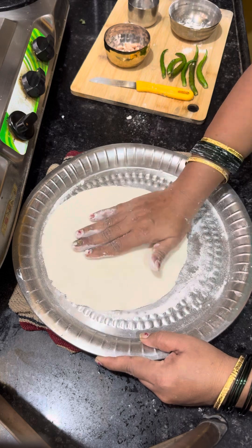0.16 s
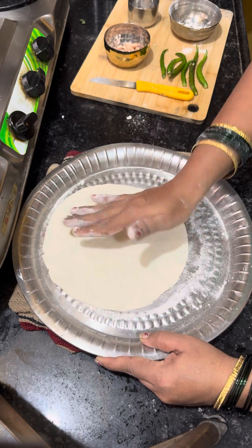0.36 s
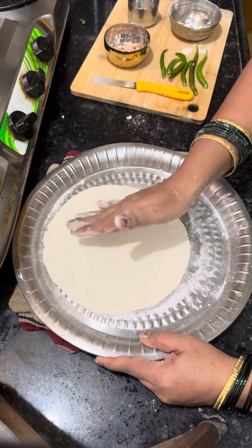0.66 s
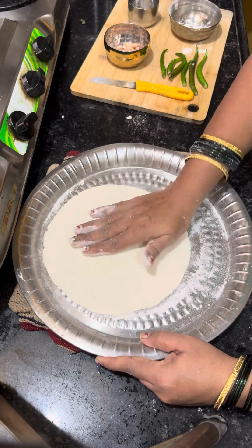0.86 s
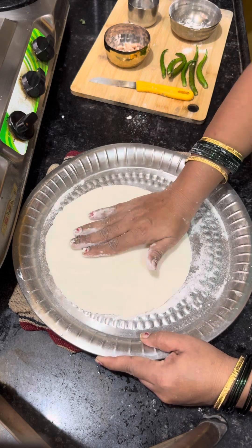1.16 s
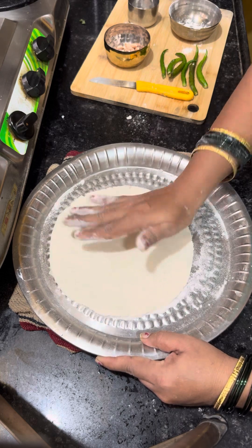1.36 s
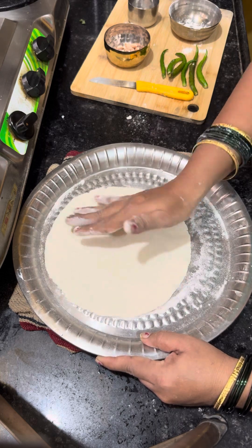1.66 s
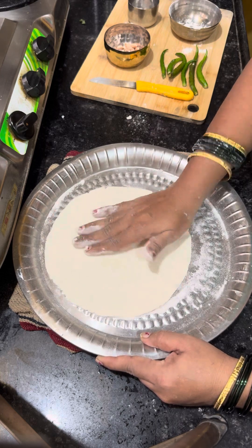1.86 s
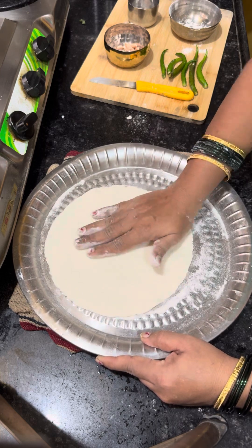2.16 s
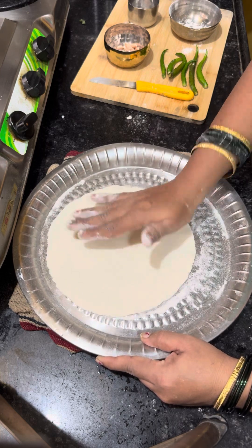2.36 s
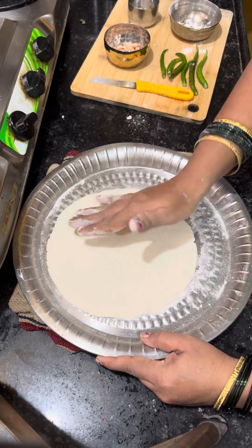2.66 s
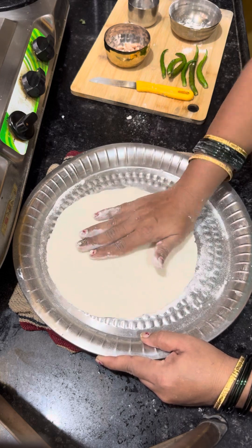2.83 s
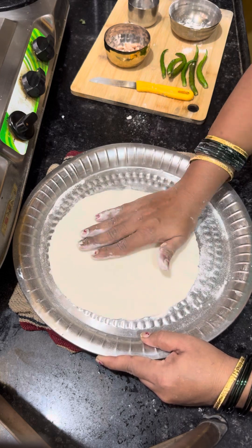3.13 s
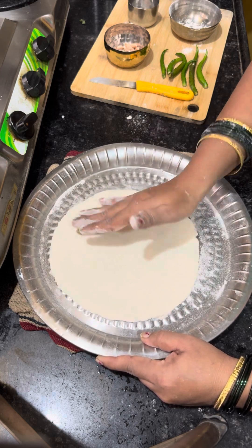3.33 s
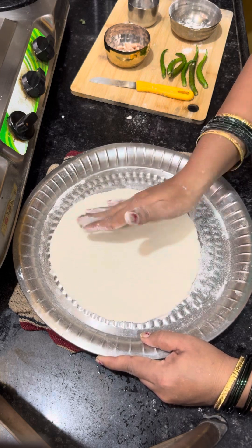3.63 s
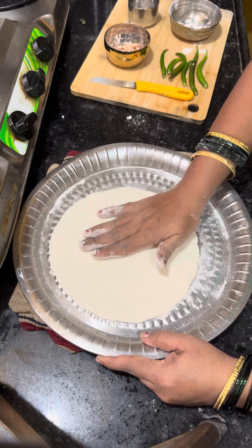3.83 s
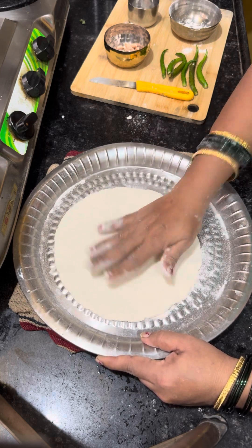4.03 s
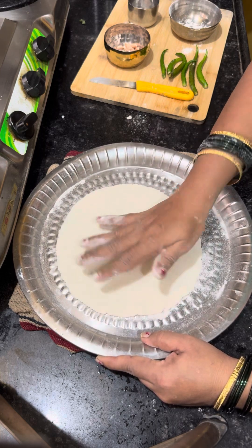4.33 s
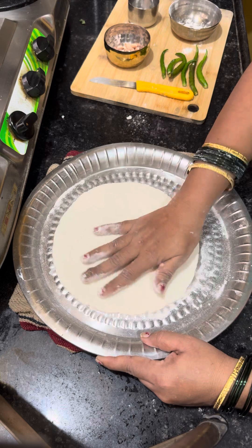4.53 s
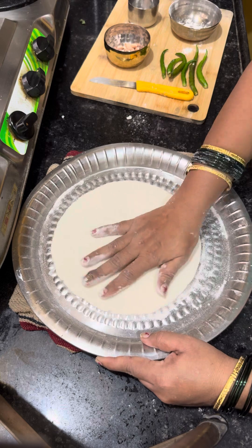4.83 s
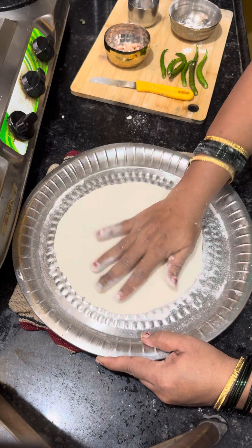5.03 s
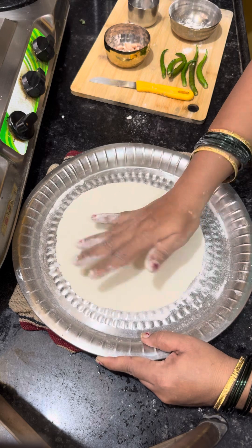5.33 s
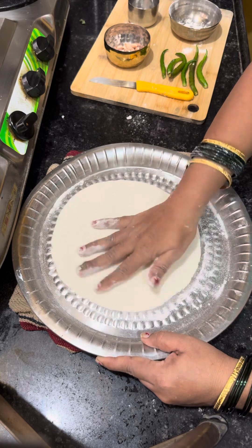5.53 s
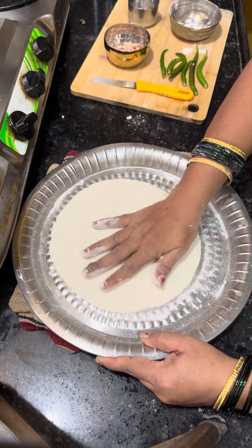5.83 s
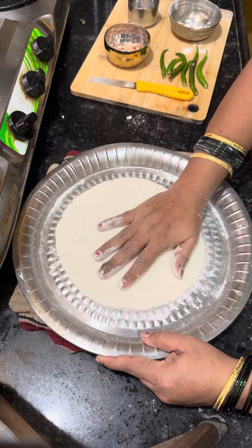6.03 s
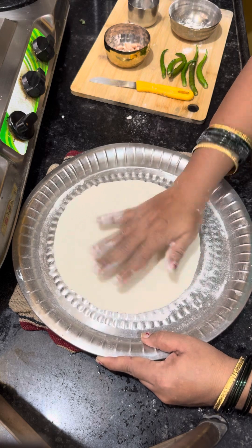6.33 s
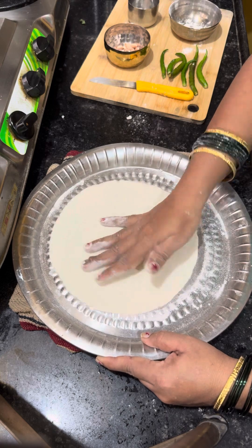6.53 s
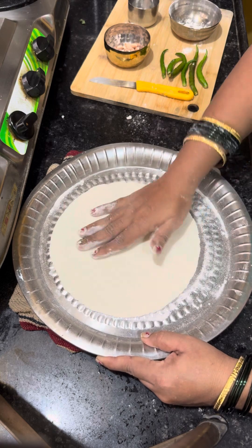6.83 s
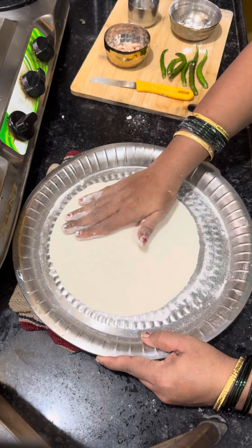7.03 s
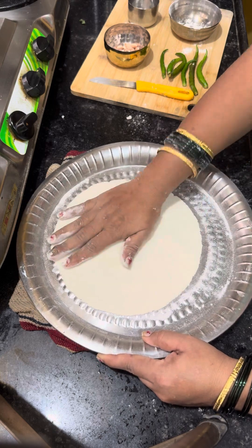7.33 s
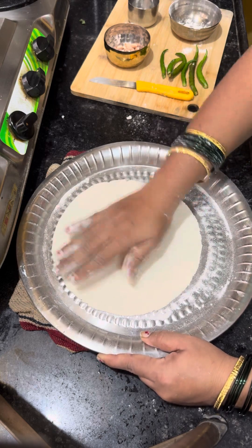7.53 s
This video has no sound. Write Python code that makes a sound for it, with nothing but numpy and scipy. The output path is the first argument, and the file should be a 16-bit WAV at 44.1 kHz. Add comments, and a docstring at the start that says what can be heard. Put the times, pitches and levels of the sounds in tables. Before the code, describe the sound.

A hand pats soft dough on a thin steel plate about three times a second, the plate ringing and glass bangles clinking with most pats.

```python
"""A hand pats a round of dough flat on a floured steel plate, about three times a second, in a small kitchen.
Fingertips graze the dough, then the fingers land with a dull slap of noise and a pop of trapped air.
A moment later, on most pats, the heel of the hand comes down: the plate rings in decaying modes and the
glass bangles gather, crack together and shiver. Then a swell of friction noise pushes the dough round.
About two thirds of the way through comes one faint thin tone; creeping dough and room tone run throughout."""
import sys
import numpy as np
from scipy import signal
from scipy.fft import rfft, irfft, next_fast_len
from scipy.io import wavfile

SR = 44100
rng = np.random.default_rng(int(sys.argv[2]) if len(sys.argv) > 2 else 0)


def to_wav(sig):
    """Store sig (one row per channel, or 1-D mono) as 16-bit WAV at the path in sys.argv[1].

    Samples outside -1..1 are clipped; the rate is SR.
    """
    pcm = np.clip(np.atleast_2d(sig), -1, 1) * 32767
    pcm = np.round(pcm).astype(np.int16)
    wavfile.write(sys.argv[1], SR, pcm.T)  # frames by channels


N = 338671
AGE = np.arange(SR // 2) / SR  # time since a contact [s]
# an ordinary slap and a firm knock, against which the others are weighed [dB]
USUAL_SLAP_DB, FIRM_KNOCK_DB = -27.5, -25
HEEL_WITHIN_S = 0.05  # the heel follows the fingers within this time, or not at all


# fingers landing on dough: (time [s], relative level [dB], pitch of the trapped air [Hz])
FINGER_SLAPS = [(0.136, -28, 1100), (0.47, -25.5, 1124), (0.794, -32, 726), (1.125, -30.5, 760),
                (1.457, -25, 1150), (1.785, -29.5, 1140), (2.116, -31, 1180), (2.449, -32.5, 1080),
                (2.779, -33, 960), (3.116, -31, 1085), (3.451, -36, 830), (3.782, -30, 920),
                (4.098, -25.5, 740), (4.4228, -27, 760), (4.7503, -28, 1130), (5.09, -27, 815),
                (5.4234, -26.5, 645), (5.739, -27, 800), (6.063, -27, 785), (6.4028, -24, 780),
                (6.747, -30, 890), (7.34, -30, 910), (7.628, -28.5, 1230)]
# time the hand takes to lie flat, long for the closed palm, short for spread fingers:
# (time [s], landing time [s])
LANDING_TIME = [(1.45, 0.0036), (2.2, 0.0046), (3.5, .0045), (4.45, 0.0016), (5.1, .0011), (6.75, 0.0011),
                (7.3, 0.0024)]
# colour of the air pop: (frequency [Hz], relative level per Hz [dB])
POP_SPECTRUM = [(150, -6), (380, -2.5), (560, 0), (800, -0.5), (1150, -1), (1400, 0.5), (1750, -5),
                (2500, -9.5), (3100, -19), (6000, -44)]
# colour of the dull thud: (frequency [Hz], relative level per Hz [dB])
THUD_SPECTRUM = [(20, -23), (60, -14), (140, -15), (240, -1.5), (300, 0.5), (420, -16.5), (900, -37)]
# colour of the faint crack: (frequency [Hz], relative level per Hz [dB])
CRACK_SPECTRUM = [(1500, -30), (3200, 2), (4700, 9.5), (6000, 2.5), (8500, -3), (12000, -4.5), (16000, 4)]


def slaps(slap_db=26.5, thud_db=-9, thud_growth=0.61, no_heel_db=-6, crack_db=-17, crack_growth=1.3,
          spread_db=5, flat_s=0.001, spread_growth_db=4):
    """Soft skin on dough: a pop of trapped air, a faint crack and a thud, weaker when the heel stays up."""
    out = np.zeros(N)
    for s, db, air_hz in FINGER_SLAPS:
        rise_s = at_time(LANDING_TIME, s)
        force_db = db - USUAL_SLAP_DB
        heel_up = not any(0 < knock[0] - s < HEEL_WITHIN_S for knock in HEEL_KNOCKS)

        # a slow landing breaks up into many small contacts
        spray_db = spread_db + spread_growth_db * np.log2(rise_s / flat_s)
        contact = colour(impact(spray_db, rise_s=rise_s, t60=0.055), POP_SPECTRUM)
        pop = pocket(contact, air_hz, width_hz=240, boost_db=6.5)
        thud = colour(impact(spread_db=-0.5, rise_s=rise_s, t60=0.16), THUD_SPECTRUM)
        crack = colour(burst(rise_s=rise_s + 0.00024, t60=0.066), CRACK_SPECTRUM)

        pop_gain = from_db(db + slap_db)
        thud_gain = from_db(thud_db + thud_growth * force_db + no_heel_db * heel_up)
        crack_gain = from_db(crack_db + crack_growth * force_db)
        # start early, so that the main contact falls at s
        add(out, s - rise_s, pop_gain * unit(pop) + thud_gain * unit(thud) + crack_gain * unit(crack))
    return out


# colour of skin brushing dough: (frequency [Hz], relative level per Hz [dB])
BRUSH_SPECTRUM = [(200, -12.5), (650, 10), (1200, -2.5), (2500, -8.5), (4000, -26), (12000, -27.5),
                  (16000, -51)]


def approaches(level_db=17, lead=3.0, slow_s=0.0041):
    """Fingertips graze the dough before the hand lies flat: the slower the landing, the more of it."""
    out = np.zeros(N)
    for s, db, _ in FINGER_SLAPS:
        rise_s = at_time(LANDING_TIME, s)
        graze = unit(colour(burst(rise_s=lead * rise_s, t60=0.027), BRUSH_SPECTRUM))
        add(out, s - lead * rise_s, from_db(db + level_db) * rise_s / slow_s * graze)
    return out


# heel of the hand coming down:
# (time [s], relative level of the plate knock [dB], relative level of the bangle clash [dB])
HEEL_KNOCKS = [(0.1467, -28.5, -38.5), (0.481, -31, -37), (0.804, -25, -34), (1.135, -32, -37.5),
               (1.466, -31.5, -37.5), (1.7896, -25.5, -37), (2.124, -26.5, -36), (2.4563, -24, -33),
               (2.79, -25.5, -37), (3.1238, -26.5, -37.5), (3.4593, -25.5, -35), (3.7944, -27.5, -36),
               (4.1198, -36, -50), (4.4455, -38.5, -51.5), (5.1063, -37.5, -47.5), (5.4413, -35.5, -47),
               (5.754, -35.5, -44), (6.081, -36, -45.5), (6.416, -33.5, -42), (6.762, -31.5, -40)]
# low modes of the plate's floor: (nominal pitch [Hz], relative level [dB], t60 [s])
FLOOR_MODES = [(107.6, -14.5, 0.6), (127, -16.5, 0.5), (188, -7.5, 0.42), (236, -6.5, 0.63),
               (275.8, 1.5, 0.47), (284, 6, 0.21)]
# modes of the plate's wall: (nominal pitch [Hz], relative level [dB], t60 [s])
WALL_MODES = [(574, -14, 0.12), (639, -25, 0.3), (691.4, -22.5, 0.16), (1066, -9.5, 0.15),
              (1135.3, -2, 0.063), (1129, -6.5, 0.094), (1223, -21.5, 0.22), (1591, -10.5, 0.079),
              (2016, -20, 0.13)]
# upper modes that only a hard knock wakes: (nominal pitch [Hz], relative level [dB], t60 [s])
HARD_KNOCK_MODES = [(1092, -2, 0.2), (1070, -7.5, 0.18), (1620, -13, 0.061), (1752, -3, 0.18),
                    (1796, -2, 0.16), (1860, -6, 0.21), (1907, -7, 0.19), (2034, -4, 0.089),
                    (2100, -11.5, .15)]
# rim modes, lightly damped, heard on soft blows too: (nominal pitch [Hz], relative level [dB], t60 [s])
PLATE_RIM_MODES = [(2470, -9.5, 0.28), (2490, -11, 0.25), (2535, -5, 0.25), (2554, -8.5, 0.33),
                   (2526, -4.5, 0.17), (2592, -6, 0.25)]
# how much the heel's place on the dough favours the rim modes: (time [s], level [dB])
RIM_FAVOUR = [(0.15, -1.5), (1.47, 2), (2.12, -25), (4.12, -7), (6.76, 4)]
# colour of the plate's noisy wash: (frequency [Hz], relative level per Hz [dB])
WASH_SPECTRUM = [(150, -24.5), (350, -4), (620, -8.5), (850, -6.5), (1100, -2), (1400, -4.5), (1850, -1),
                 (2330, -9), (2560, -1.5), (2750, -7.5), (3200, -9), (5000, -35)]


def plate(boom_db=-5, boom_growth=0.46, ring_db=29, wash_db=27, hard_db=4, hard_growth=2.7,
          rim_db=-7, rim_growth=0.77):
    """The plate booms and rings, damped by dough and holding hand; harder knocks ring brighter."""
    out = np.zeros(N)
    for s, db, _ in HEEL_KNOCKS:
        force_db = db - FIRM_KNOCK_DB
        boom = from_db(boom_db + boom_growth * force_db) * ring(FLOOR_MODES, detune=0.011)
        wall = from_db(db + ring_db) * ring(WALL_MODES, detune=0.0057)
        hard = from_db(hard_db + hard_growth * force_db) * ring(HARD_KNOCK_MODES, detune=0.0039)
        rim_gain = from_db(rim_db + at_time(RIM_FAVOUR, s) + rim_growth * force_db)
        rim = rim_gain * ring(PLATE_RIM_MODES, detune=0.0031)
        wash = from_db(db + wash_db) * unit(colour(burst(rise_s=0.00063, t60=0.31), WASH_SPECTRUM))
        add(out, s, boom + wall + hard + rim + wash)
    return out


# thin ringing of the steel under a hard clash: (nominal pitch [Hz], relative level [dB], t60 [s])
THIN_STEEL_MODES = [(3957, -8, .22), (4076, -10, .2), (4463, -12, .2), (4900, -3, .14), (4945, -2, .17),
                    (4982, -2, .17), (5125, -4, .17), (5819, -5, .2), (5889, -3, .2), (5954, -3, .2),
                    (6880, -7, .2), (7014, -1, .19), (7165, -8, .2), (7354, -7, .2)]
# how much the heel's place on the dough favours the highest modes: (time [s], level [dB])
SHIMMER_FAVOUR = [(0.8, -4), (2.1, 0), (3.46, 2.5), (3.8, 9), (4.12, -3)]


def shimmer(level_db=-7, growth=2.5):
    """The highest plate modes grow faster than the knock that wakes them."""
    out = np.zeros(N)
    for s, db, _ in HEEL_KNOCKS:
        ring_db = level_db + growth * (db - FIRM_KNOCK_DB) + at_time(SHIMMER_FAVOUR, s)
        add(out, s, from_db(ring_db) * ring(THIN_STEEL_MODES, detune=0.0022))
    return out


GATHER_S = 0.02  # time the bangles take to slide together
# colour of the pitched clink: (frequency [Hz], relative level per Hz [dB])
CLINK_SPECTRUM = [(1000, -24), (2000, 3), (3200, -22), (4080, -6), (4550, -4), (4980, 6.5), (5350, -4),
                  (5830, 0), (6400, -22), (7050, -15), (8200, -12.5), (16000, -40)]
# colour of the bright sizzle: (frequency [Hz], relative level per Hz [dB])
SIZZLE_SPECTRUM = [(2000, -22.5), (4000, 4), (7000, 4.5), (8600, 0.5), (10500, 3), (11800, 5), (12500, 1.5),
                   (13200, 6), (14200, 1), (15500, -0.5)]


def bangles(clink_db=1.35, sizzle_db=36.0, clink_crack_db=9, sizzle_crack_db=2.0):
    """Glass bangles on the patting wrist: a pitched clink under a bright sizzle."""
    out = np.zeros(N)
    for s, knock_db, clash_db in HEEL_KNOCKS:
        clink = clash(clink_crack_db, crack_t60=0.016, shiver_t60=0.17, gather_db=-1.5, gather_t60=0.019)
        clink = unit(colour(clink, CLINK_SPECTRUM))
        sizzle = clash(sizzle_crack_db, crack_t60=0.04, shiver_t60=0.25, gather_db=-6.0, gather_t60=0.018)
        sizzle = unit(colour(sizzle, SIZZLE_SPECTRUM))
        clink_gain = from_db(clink_db + clink_strength(s, knock_db))
        add(out, s - GATHER_S, clink_gain * clink + from_db(clash_db + sizzle_db) * sizzle)
    return out


def clash(sharp_db, crack_t60, shiver_t60, gather_db, gather_t60):
    """The bangles slide together, meet in one crack GATHER_S later, then shiver against each other."""
    gather = unit(rng.standard_normal(len(AGE)) * from_db(-60 * np.abs(AGE - GATHER_S) / gather_t60))
    crack = unit(impact(spread_db=5.5, rise_s=0.0004, t60=crack_t60))
    after = from_db(sharp_db) * crack + burst(rise_s=0.0018, t60=shiver_t60)
    delayed = np.pad(after, (round(GATHER_S * SR), 0))[:len(AGE)]
    return from_db(gather_db) * gather + delayed


# how clearly the bangles clink, more so once settled on the wrist: (time [s], level [dB])
CLINK_CLEARNESS = [(0.15, -3), (1.5, -0.5), (2.1, 1), (6.76, 3)]


def clink_strength(s, knock_db, growth=1.53):
    """Strength of the bangles' clink in dB: it grows faster than the knock that shakes them."""
    return growth * (knock_db - FIRM_KNOCK_DB) + at_time(CLINK_CLEARNESS, s)


# the push after each pat: delay, length, level of the flour and of the skin
PUSH_DELAY_S, PUSH_S, PUSH_FLOUR_DB, PUSH_SKIN_DB = 0.135, 0.053, -55.5, -63
PUSHING_UNTIL_S = 7.0  # the last pats only tap the edge and do not turn the dough
CREEP_DB = -55.5  # middle level of the dough creeping on the flour
PEEL_HZ = 770  # pitch stressed as the palm peels off
# colour of dough on flour: (frequency [Hz], relative level per Hz [dB])
FLOUR_SPECTRUM = [(150, -23), (400, 1.5), (650, 2.5), (1150, -3), (1700, -4.5), (2500, -11.5),
                  (3500, -19.5), (8000, -24), (16000, -29)]
# friction of floury skin: (frequency [Hz], relative level per Hz [dB])
SKIN_SPECTRUM = [(1000, -3), (3000, -1.5), (5000, -0.5), (8000, -5), (10000, -4.5), (13000, 0),
                 (16000, -3.5)]
# the hand shifting its place: (time [s], length [s], level of brushed dough [dB], of rubbed skin [dB])
HAND_SHIFTS = [(0.66, 0.042, -46, -72), (6.369, 0.028, -48.5, -53), (7.012, 0.027, -64, -60),
               (7.198, 0.027, -48.5, -54.5), (7.269, 0.051, -46.5, -72), (7.365, .034, -50, -75),
               (7.534, 0.025, -43.5, -59)]
# the palm peeling off the dough shortly before a pat: (time [s], relative level [dB])
PALM_PEELS = [(0.074, -41), (0.716, -34.5), (1.067, -37), (1.374, -35.5), (1.713, -38), (2.05, -41),
              (2.376, -44), (3.407, -37), (7.015, -40)]


def turning(peel_db=20.0, uneven_db=2.5, slips_per_s=40):
    """Friction noise: dough creeps unevenly and is pushed on after pats; the hand shifts, and the palm peels
    off it."""
    slips = np.interp(np.arange(N) / SR * slips_per_s, np.arange(SR), rng.standard_normal(SR))
    out = from_db(CREEP_DB + uneven_db * slips) * hiss(FLOUR_SPECTRUM)
    for s, *_ in FINGER_SLAPS:
        if s < PUSHING_UNTIL_S:
            flour = stroke(PUSH_S, PUSH_FLOUR_DB, FLOUR_SPECTRUM)
            skin = stroke(PUSH_S, PUSH_SKIN_DB, SKIN_SPECTRUM)
            add(out, s + PUSH_DELAY_S, flour + skin)
    for s, length_s, dough_db, skin_db in HAND_SHIFTS:
        brushed = stroke(length_s, dough_db, BRUSH_SPECTRUM)
        rubbed = stroke(length_s, skin_db, SKIN_SPECTRUM)
        add(out, s, brushed + rubbed)
    for s, db in PALM_PEELS:
        contact = colour(burst(rise_s=0.00085, t60=0.037), FLOUR_SPECTRUM)
        peel = pocket(contact, PEEL_HZ, width_hz=620, boost_db=19)
        add(out, s, from_db(db + peel_db) * unit(peel))
    return out


def stroke(length_s, db, spectrum):
    """A short swell of friction noise."""
    swell = unit(colour(burst(rise_s=length_s / 2, t60=4 * length_s), spectrum))
    return from_db(db) * np.sqrt(length_s * SR) * swell


# a faint thin tone as the dough is turned
SQUEAK_HZ, SQUEAK_DB, SQUEAK_START_S, SQUEAK_S = 2681, -64, 4.99, 0.12


def squeak():
    """A thin sine tone that swells and fades, as something sticks and slips."""
    out = np.zeros(N)
    age = AGE[AGE < SQUEAK_S]
    tone = signal.windows.tukey(len(age)) * np.sin(2 * np.pi * SQUEAK_HZ * age)
    add(out, SQUEAK_START_S, from_db(SQUEAK_DB) * tone)
    return out


# kitchen reverberation: (frequency [Hz], t60 [s], level [dB])
KITCHEN_DECAY = [(100, 0.57, -18), (310, 0.31, -1), (1050, 0.51, -12.5), (2980, 0.51, -13.5),
                 (5840, 0.45, -13.5), (13800, 0.4, -14)]


def kitchen(x, first_echo_s=0.0076):
    """Diffuse reflections: noise in octave bands, each dying away at its own rate."""
    age = np.arange(SR) / SR
    hz, t60, db = np.transpose(KITCHEN_DECAY)
    tail = np.zeros(SR)
    for low in 75 * 2 ** np.arange(8):
        octave = signal.butter(2, [low, 2 * low], "band", fs=SR, output="sos")
        band = signal.sosfilt(octave, rng.standard_normal(SR))
        centre = np.log(low * np.sqrt(2))
        decay_s = np.interp(centre, np.log(hz), t60)
        level_db = np.interp(centre, np.log(hz), db)
        build_up = 1 - np.exp(-(age / first_echo_s) ** 2)
        tail += band * from_db(level_db) * unit(from_db(-60 * age / decay_s) * build_up)
    return signal.fftconvolve(x, tail)[:N]


ROOM_TONE_DB = -55
# colour of the kitchen's steady noise: (frequency [Hz], relative level per Hz [dB])
ROOM_SPECTRUM = [(20, -3.5), (58, -7), (110, -0.5), (150, -4.5), (300, -1), (600, -9), (1120, -3.5),
                 (2500, -25), (3500, -25), (9000, -33.5), (16000, -33)]


def room_tone():
    """The kitchen's faint steady noise."""
    return from_db(ROOM_TONE_DB) * hiss(ROOM_SPECTRUM)


def hiss(spectrum):
    """Steady coloured noise of rms one."""
    return unit(colour(rng.standard_normal(N), spectrum)) * np.sqrt(N)


def burst(rise_s, t60):
    """A spray of tiny contacts that swells and dies away."""
    swell = 1 - np.exp(-(AGE / rise_s) ** 2)
    return unit(rng.standard_normal(len(AGE)) * swell * from_db(-60 * AGE / t60))


def impact(spread_db, rise_s, t60):
    """One main contact amid a spray of small ones."""
    return signal.unit_impulse(len(AGE), round(rise_s * SR)) + from_db(spread_db) * burst(rise_s, t60)


def ring(modes, detune):
    """Decaying modes; the hand's weight and place vary their strength and pitch a little at each blow."""
    hz, db, t60 = np.transpose(modes)[:, :, None]
    louder, higher, side = rng.uniform(-1, 1, (3, len(modes), 1))
    strength = from_db(db + 4 * louder) * np.sign(side)  # random polarity
    phase = 2 * np.pi * hz * (1 + detune * higher) * AGE
    return unit(np.sum(strength * from_db(-60 * AGE / t60) * np.sin(phase), axis=0))


def pocket(x, hz, width_hz, boost_db):
    """Air trapped under the hand stresses one pitch."""
    b, a = signal.iirpeak(hz, hz / width_hz, fs=SR)
    return x + from_db(boost_db) * signal.lfilter(b, a, x)


def colour(x, spectrum):
    """Causal (minimum-phase) filter with the given spectrum."""
    size = 2 * next_fast_len(len(x))
    hz, db = np.transpose(spectrum)
    grid = np.maximum(np.fft.rfftfreq(size, 1 / SR), 1)
    gain = from_db(np.interp(np.log(grid), np.log(hz), db))
    # fold the cepstrum forward in time for minimum phase
    cepstrum = irfft(np.log(gain))
    cepstrum[1:size // 2] *= 2
    cepstrum[size // 2 + 1:] = 0
    return irfft(rfft(x, size) * np.exp(rfft(cepstrum)))[:len(x)]


def from_db(db):
    """Decibels to gain."""
    return 10 ** (np.asarray(db) / 20)


def unit(x):
    """Scale to a total energy of one."""
    return x / np.sqrt(np.sum(x ** 2) + 1e-20)


def at_time(curve, s):
    """Value of a control curve at time s."""
    return np.interp(s, *np.transpose(curve))


def add(track, s, sound):
    """Mix a sound into a track from time s."""
    at = max(round(s * SR), 0)
    track[at:at + len(sound)] += sound[:max(N - at, 0)]


def scene():
    """Hand, plate and bangles close by, in the kitchen's reverberation and faint steady noise."""
    near = slaps() + approaches() + plate() + shimmer() + bangles() + turning() + squeak()
    return (near + kitchen(near) + room_tone())[None]


CUTOFF_HZ = 16000


def record(dry):
    """The top is cut steeply."""
    steep = signal.ellip(12, 0.2, 80, CUTOFF_HZ, fs=SR, output="sos")  # 0.2 dB ripple, 80 dB stopband
    return signal.sosfilt(steep, dry)


dry = scene()
out = record(dry)
to_wav(out)
```